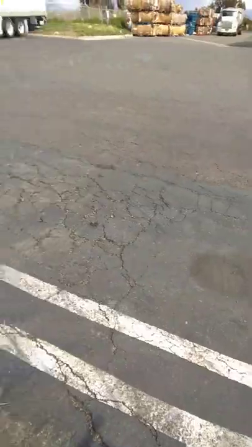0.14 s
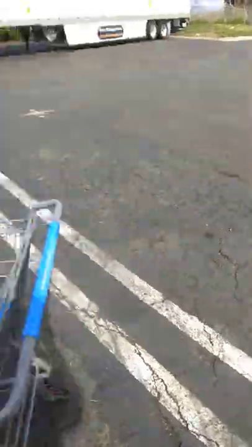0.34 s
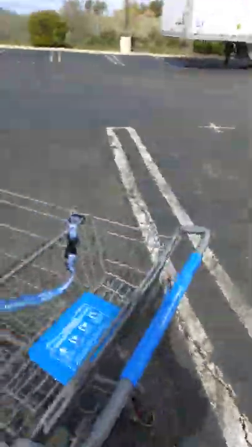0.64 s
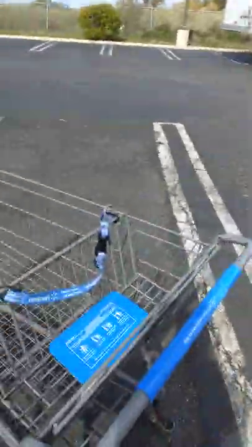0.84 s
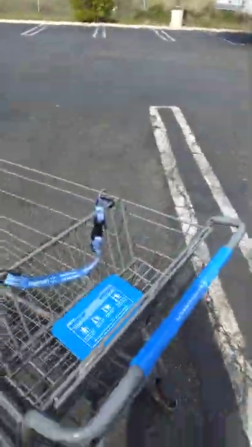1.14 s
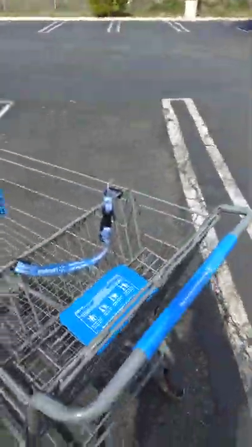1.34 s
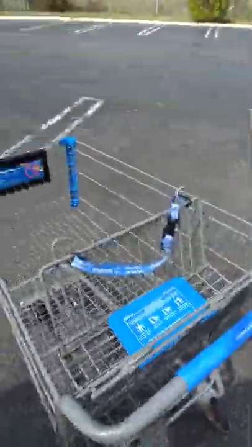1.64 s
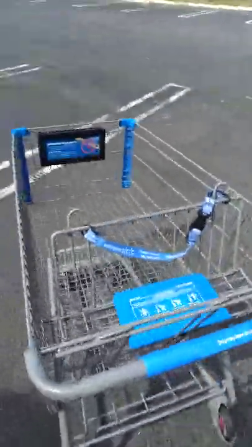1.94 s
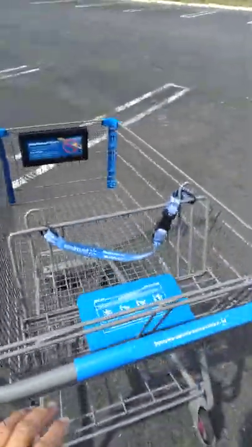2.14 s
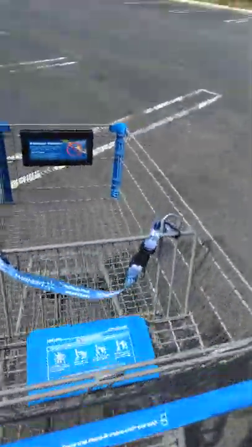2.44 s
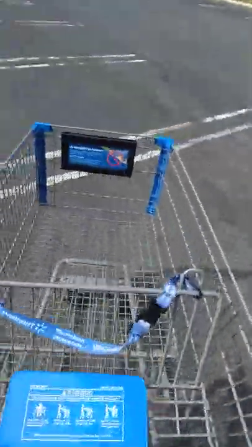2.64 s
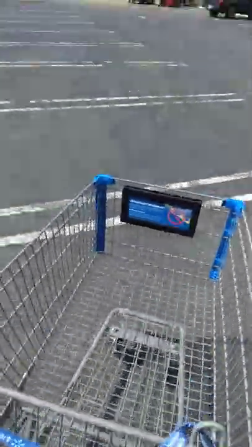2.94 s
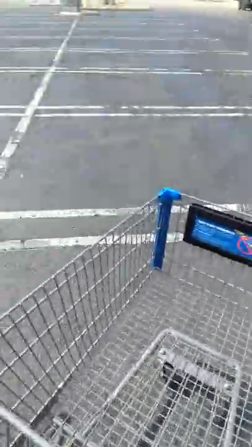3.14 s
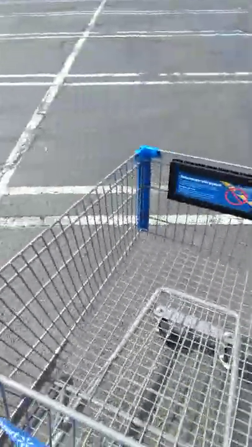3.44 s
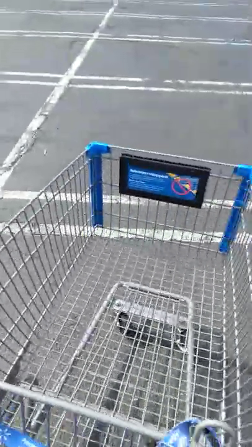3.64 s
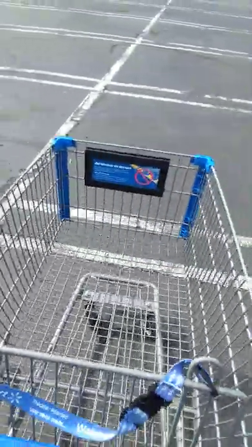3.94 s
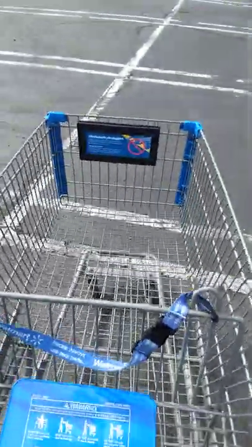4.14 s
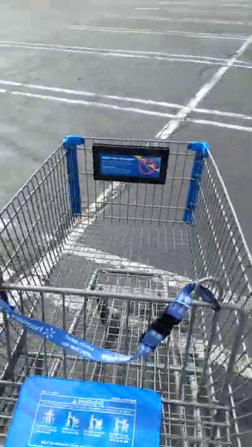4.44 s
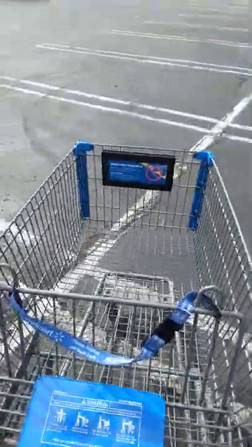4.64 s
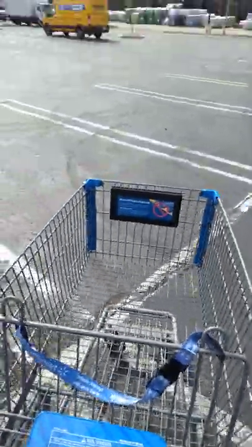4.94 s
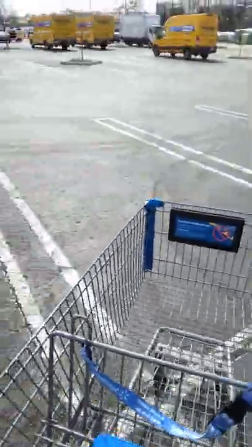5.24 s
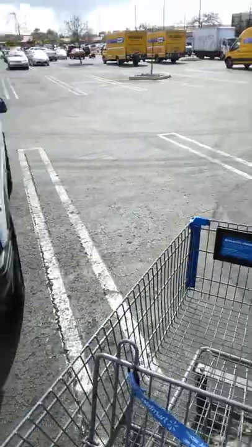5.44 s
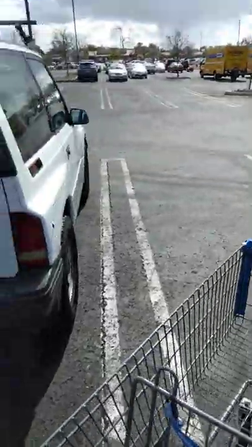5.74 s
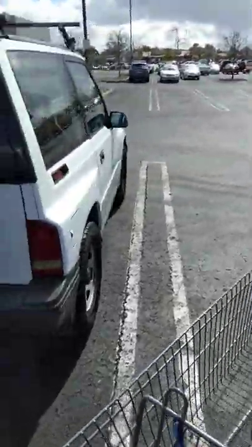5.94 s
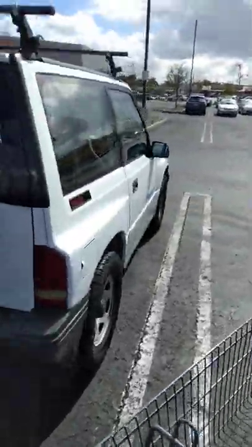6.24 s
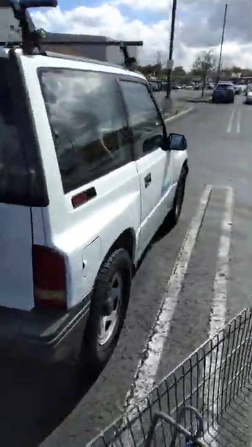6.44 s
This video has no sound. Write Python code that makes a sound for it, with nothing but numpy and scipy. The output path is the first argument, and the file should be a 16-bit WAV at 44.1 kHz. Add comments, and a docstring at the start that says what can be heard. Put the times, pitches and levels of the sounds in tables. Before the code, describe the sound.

Wind buffets a handheld phone in an open car park, a hand thumps it, then a metal wire cart rolls and rattles over rough asphalt.

```python
"""A wire shopping cart stands silent in an open car park, then rolls over rough asphalt and rattles to a stop:
filtered noise makes its wheels and loose wires, short impulses its hard blows, decaying modes its stiff rods.
Wind noise buffets the two microphone ports of a hand-held phone separately; a hand bumps the phone once.
Far traffic, a faint hum and a treble rustle fill the background, with a few scuffs and small pitched clicks.
The left port adds a strong treble resonance to the cart, the scuffs and the background."""
import sys
import numpy as np
from scipy import signal
from scipy.fft import rfft, irfft, next_fast_len
from scipy.io import wavfile
from scipy.ndimage import uniform_filter1d

SR = 44100
rng = np.random.default_rng(int(sys.argv[2]) if len(sys.argv) > 2 else 0)


def persist_wave(psi):
    """Save psi, clipped to +-1, as 16-bit WAV."""
    counts = np.round(np.clip(psi, -1, 1) * 32767).astype(np.int16)
    wavfile.write(sys.argv[1], SR, np.atleast_2d(counts).T)


N = 291093  # length in samples

# All levels below are mix settings, ahead of any trims and random swells in the functions.
# Far traffic over time. Each row: time in seconds, level in dB.
TRAFFIC_LEVEL = [(0, -49.5), (1.3, -52), (2.4, -50), (2.8, -52.5), (3.3, -46), (6.6, -53.5)]
# Tone of far traffic. Each row: frequency in Hz, relative level per hertz in dB.
TRAFFIC_TONE = [(60, 4), (200, -11), (500, -17), (1000, -19), (2500, -26), (5000, -40.5), (10000, -57),
                (16000, -52)]
# A faint treble rustle over time. Each row: time in seconds, level in dB.
RUSTLE_LEVEL = [(0, -62), (.1, -74), (.265, -73), (.29, -59.5), (.44, -60), (.51, -69), (.9, -63.5),
                (1.02, -70), (1.25, -62), (1.36, -69), (1.95, -73), (2.05, -64), (3.1, -69), (3.3, -58)]
# Tone of the rustle. Each row: frequency in Hz, relative level per hertz in dB.
RUSTLE_TONE = [(4200, -14), (4800, 1.5), (6300, -5), (7500, -11), (9000, -15), (11000, -10), (14000, -32)]
# A faint far hum over time. Each row: time in seconds, level in dB.
HUM_LEVEL = [(0, -50), (.9, -60), (6.6, -58)]
HUM_HZ = 965

# The breeze under the gusts. Each row: time in seconds, left port level in dB, right port level in dB.
BREEZE = [(0, -46, -39), (.55, -57, -42), (.62, -59, -27), (.76, -35, -24.5), (.84, -21, -34.5),
          (1.15, -29, -21), (1.5, -36, -21.5), (1.7, -24, -35), (2.2, -26, -26), (2.7, -19.5, -24),
          (3.05, -19.5, -23), (3.45, -32, -32), (4.05, -22, -23), (4.35, -33.5, -28.5), (4.6, -17, -20),
          (5.1, -25.5, -33), (5.3, -13, -17.5), (5.7, -14, -26), (5.95, -18.5, -17), (6.6, -24, -28)]
# Tone of the large eddies. Each row: frequency in Hz, relative level per hertz in dB.
LARGE_EDDY_TONE = [(8, -2.5), (30, 1), (90, -1.5), (170, -7), (300, -22.5), (600, -53), (2000, -100)]
# Tone of the small eddies. Each row: frequency in Hz, relative level per hertz in dB.
SMALL_EDDY_TONE = [(60, -20.5), (220, 1.5), (400, -8), (700, -21), (1200, -33.5), (4000, -89)]
BREEZE_BRIGHT_DB = -14.5  # small eddies against large
# Gusts at the ports. Each row: peak time in seconds, length in seconds, level at the louder port in dB,
# left minus right in dB, brightness (small eddies against large) in dB.
GUSTS = [(0.334, 0.038, -16, 14, -22), (0.973, 0.15, -21.5, 27, -0.5), (1.083, 0.14, -10.5, 8, -13.5),
         (1.213, 0.14, -16, -7, -13.5), (1.413, 0.099, -9.5, -31, -9), (1.634, 0.1, -16.5, 18, -30),
         (1.805, 0.19, -15, -16, -32), (1.95, 0.14, -30, 8, 3), (2.044, 0.27, -18.5, 18, -12),
         (2.437, 0.42, -26, 21, 6), (2.586, 0.24, -26.5, 25, 5.5), (2.914, 0.14, -8, 28, -3.5),
         (3.185, 0.18, -14, 26, -23), (3.536, 0.06, -16, 20, -29), (4.496, 0.11, -17, -17, -10),
         (4.746, 0.47, -16.5, 21, -27), (4.981, 0.04, -13, 18, -27), (5.282, 0.34, -28, 2, 0),
         (5.392, 0.07, -9, 23, -13), (5.482, 0.12, -11, 15, -5.5), (5.556, 0.17, -13.5, 7, -12.5),
         (5.668, 0.085, -9.5, 20, -6), (5.755, 0.11, -12, 21, -9), (5.89, 0.13, -13, -22, -13),
         (6.093, 0.049, -16, -17, -12), (6.39, 0.068, -11, 14, -21), (6.507, 0.098, -13, 12, -16),
         (6.557, 0.13, -14.5, -3, -13)]
GUST_ROUND = 1.66  # power of the sine arch that shapes a gust

# Small hard clicks with a pitch: one at 0.65 s, two finger ticks on the phone body during the bump,
# a faint one at 3 s. Each row: start in seconds, level in dB, pitch in Hz.
CLICKS = [(0.6465, -34, 1880), (2.317, -35, 2650), (2.3500, -31, 2670), (3.009, -48, 4700)]
# Modes of a click. Each row: multiple of the pitch, relative level in dB.
CLICK_MODES = [(1, 5.5), (2, -3), (4, -3.5)]
# The sharpest wind pops. Each row: time in seconds, level in dB, left minus right in dB.
POPS = [(0.97, -25.5, 25), (1.178, -14.5, -11), (1.389, -15, -22.5), (1.463, -20, -27), (1.797, -17.5, -20),
        (1.935, -17, 3), (2.894, -19, 26), (5.216, -14, 0), (5.265, -14.5, -20), (5.321, -10, -2),
        (5.377, -12, 20), (5.398, -24, 11), (5.437, -20, 20), (5.457, -26, 12), (5.49, -15, 16),
        (5.547, -13.5, 25), (5.591, -14.5, 15), (5.674, -22.5, 18), (6.376, -26, 19), (6.484, -19.5, 14)]

# The hand bumping the phone body. Each row: time in seconds, thud level in dB, skin rub level in dB.
BUMP = [(2.203, -9, -40), (2.218, -5, -33.5), (2.235, -9.5, -37), (2.251, -5, -31), (2.27, -13, -34),
        (2.296, -10, -46), (2.32, -21, -39), (2.36, -19.5, -45), (2.42, -23, -57)]
# Tone of the thud. Each row: frequency in Hz, relative level per hertz in dB.
THUD_TONE = [(12, -8), (35, 6), (110, -1), (240, 1), (400, -11), (850, -19), (1500, -29), (2600, -27),
             (4000, -71)]
# Tone of rubbing skin and of scuffs. Each row: frequency in Hz, relative level per hertz in dB.
RUB_TONE = [(300, -8), (1000, -13.5), (3000, -18.5), (7500, -27.5), (12000, -40), (16000, -76)]
# Fingers ticking on the phone body during the bump.
# Each row: start in seconds, level in dB, 60 dB decay time in seconds, left minus right in dB.
FINGERS = [(2.208, -22, 0.037, 2), (2.218, -17.5, 0.032, -2), (2.2253, -21.5, 0.063, -1),
           (2.2588, -22.5, 0.07, 4), (2.3136, -29, 0.022, 5), (2.3509, -19.5, 0.024, 2)]
# Tone of the phone body. Each row: frequency in Hz, relative level per hertz in dB.
SHELL_TONE = [(300, 9), (1500, 1.5), (2700, -2.5), (4200, -12), (7500, -6), (12000, -29), (16000, -43)]
# Small scuffs and ticks of shoe or grit nearby.
# Each row: start in seconds, level in dB, 60 dB decay time in seconds, left minus right in dB.
SCUFFS = [(2.786, -48.5, 0.19, 3), (2.989, -43, 0.099, -5), (3.263, -44, 0.059, -2),
          (3.2854, -36.5, 0.044, 1), (3.307, -45, 0.037, -1)]

# The rolling cart. Each row: time in seconds, how hard the basket shakes in dB.
ROLLING = [(3.35, -35), (3.53, -40), (3.62, -29.5), (3.82, -28), (4.03, -24.5), (4.14, -29), (4.24, -25.5),
           (4.31, -30), (4.44, -24), (4.55, -35.5), (4.74, -24), (4.88, -30.5), (5.05, -31.5),
           (5.19, -33.5), (5.25, -25), (5.35, -28), (5.68, -29.5), (5.8, -39), (6, -36), (6.25, -42.5),
           (6.6, -57.5)]
# Cracks in the asphalt jolt the basket. Each row: start in seconds, shake in dB, 60 dB decay time in seconds.
JOLTS = [(3.345, -28, 0.3), (3.378, -30, 0.1), (3.468, -28.5, 0.17), (3.645, -20.5, 0.13),
         (5.195, -19.5, 0.35), (5.85, -20.5, 0.25), (6.07, -27.5, 0.25), (6.262, -34.5, 0.24),
         (6.285, -29, 0.19), (6.525, -37, 0.15)]
JOLT_RISE_S = 0.0028
# Tone of the wheels on asphalt. Each row: frequency in Hz, relative level per hertz in dB.
ROAR_TONE = [(200, 4), (500, -1.5), (900, -7), (2400, -2.5), (5000, -9.5), (9000, -39), (16000, -30)]
# Chassis resonances under the wheels.
# Each row: frequency in Hz, level against the others in dB, 60 dB decay time in seconds.
CHASSIS = [(1420, -8, 0.005), (2050, -13, 0.012), (3000, -4, 0.0033)]
# Wheel level at the reference shake, and how many dB it gains per dB of shake.
WHEELS_DB, REFERENCE_SHAKE_DB, WHEELS_PER_SHAKE = -32.5, -26.5, 0.63
# Basket wires of many lengths ping at random, with pitches spread over a range.
PINGS_PER_S, PING_LOW_HZ, PING_HIGH_HZ, PING_T60_S = 400, 1002, 4200, 0.041
PINGS_DB = -10  # against the shaking
# Tone of the loose wires. Each row: frequency in Hz, relative level per hertz in dB.
CLATTER_TONE = [(500, -20.5), (2000, -6), (4000, 1.5), (7500, 0.5), (9400, -4.5), (10600, -2.5),
                (13000, -9.5), (14600, -19), (15600, -50)]
TICKS_PER_S = 500  # average rate of loose wire ticks
# The hardest wire blows. Each row: start in seconds, drive level in dB.
BLOWS = [(3.3453, -20), (3.3776, -19), (3.4695, -16), (3.5387, -14), (3.567, -14), (3.5846, -13.5),
         (3.6425, -12), (3.6955, -7), (3.7533, -20), (3.778, -17), (3.91, -21), (3.9504, -25), (3.979, -18),
         (4.0068, -4.5), (4.0617, -10), (4.1007, -5), (4.153, -13), (4.1837, -16), (4.2006, -8),
         (4.2285, -10), (4.2725, -16), (4.3405, -12), (4.367, -14), (4.4084, -19), (4.4335, -17),
         (4.476, -9), (4.5104, -8.5), (4.5454, -13.5), (4.5733, -13), (4.5777, -10.5), (4.5994, -10),
         (4.6444, -9.5), (4.6658, -8.5), (4.6724, -8), (4.6998, -11), (4.703, -9), (4.7346, -17),
         (4.756, -9), (4.811, -7), (4.843, -14), (4.873, -21), (4.888, -18), (4.9099, -9), (4.9234, -12.5),
         (4.959, -7), (4.9948, -8), (5.0227, -9), (5.0604, -6), (5.0988, -5), (5.1233, -9.5), (5.1585, -14),
         (5.195, -9), (5.27, -17), (5.3218, -17), (5.358, -12), (5.3996, -10.5), (5.4206, -12),
         (5.4745, -10), (5.5344, -7.5), (5.6323, -7.5), (5.7683, -18), (5.8138, -13), (5.848, -7),
         (5.9323, -10.5), (5.9953, -19), (6.0255, -10.5), (6.0716, -11), (6.1318, -16), (6.184, -15.5),
         (6.2609, -10), (6.2845, -15), (6.3865, -20.5), (6.4547, -21), (6.5242, -18.5)]
# Tone of a blow. Each row: frequency in Hz, relative level in dB.
BLOW_TONE = [(800, -14), (3000, -8), (5200, -6), (7300, 3.5), (9300, -14), (12500, -29), (14600, -20),
             (15600, -36)]
# Long-ringing rods and frame tubes.
# Each row: frequency in Hz, level against the others in dB, 60 dB decay time in seconds.
RODS = [(531.6, -9, 0.19), (762, -8, 0.06), (8437, -1, 0.054), (8510, -6.5, 0.072), (14185, -11, .045)]

# Left port against right port. Each row: frequency in Hz, gain in dB.
LEFT_PORT = [(400, 3.5), (1000, 0.5), (1300, 4.5), (2000, 3.5), (3000, 2), (4500, -3.5), (6000, 3),
             (6900, 12.5), (7450, 18), (8600, 9.5), (9600, 1.5), (15000, 0.5)]
EDGE_HZ = 15665  # upper band limit


def amp(db):
    """Decibels to gain."""
    return 10 ** (np.asarray(db) / 20)


def evened(x):
    """Scales to rms 1."""
    return x / np.sqrt(np.mean(x ** 2) + 1e-20)


def curves(rows):
    """Reads each column of a table at every sample."""
    s, *columns = np.transpose(rows)
    return [np.interp(np.arange(N) / SR, s, column) for column in columns]


def sides(pan_db):
    """Left and right gains for a level difference."""
    return amp(np.array([pan_db / 2, -pan_db / 2]))


def colour(x, points):
    """Causal minimum-phase filter with the given spectrum."""
    hz, db = np.transpose(points)
    bins_hz = abs(np.fft.fftfreq(8192, 1 / SR))
    gain_db = np.interp(np.log(bins_hz + 1), np.log(hz), db)
    log_gain = np.log(amp(gain_db))
    minimum_phase = np.exp(np.conj(signal.hilbert(log_gain)))
    taps = np.fft.ifft(minimum_phase).real[:4096]
    size = next_fast_len(N + len(taps))
    return irfft(rfft(np.atleast_2d(x), size) * rfft(taps, size), size)[:, :N]


def banded(x, lo_hz, hi_hz):
    """Scales steady noise so that its band lo-hi has rms 1, judging the spectrum from its end."""
    part = x[:, -2 ** 16:]
    power = abs(rfft(part)) ** 2
    hz = np.fft.rfftfreq(part.shape[1], 1 / SR)
    in_band = (hz > lo_hz) & (hz < hi_hz)
    return evened(x) * np.sqrt(power.sum() / power[:, in_band].sum())


def pair(same, lag):
    """Two noises with a shared part that reaches the left port lag samples late (early if negative)."""
    a, b = rng.standard_normal((2, N))
    return np.array([np.roll(same * a + np.sqrt(1 - same ** 2) * b, lag), a])


def wobble(seconds, channels):
    """Slow chance of rms 1: noise smoothed twice."""
    size = max(round(seconds * SR), 1)
    smooth = uniform_filter1d(rng.standard_normal((channels, N)), size)
    return evened(uniform_filter1d(smooth, size))


def bursts(rows, rise_s):
    """Envelope of quick rises and exponential decays, rows (s, dB, t60)."""
    out = np.zeros(N)
    for s, db, t60 in rows:
        start = round(s * SR)
        t = np.arange(min(round(t60 * SR) + 1, N - start)) / SR
        out[start:][:len(t)] += amp(db - 60 * t / t60) * (1 - np.exp(-t / rise_s))
    return out


def ring(x, hz, t60):
    """One decaying mode as a two-pole resonator, rms gain about 1 on white noise."""
    r = np.exp(-np.log(1000) / (t60 * SR))
    angle = 2 * np.pi * hz / SR
    gain = np.sqrt(2 * (1 - r * r)) * np.sin(angle)
    return gain * signal.lfilter([1], [1, -2 * r * np.cos(angle), r * r], x)


def background():
    """Far traffic, smooth and diffuse, a faint hum and a faint rustle in the treble."""
    (traffic_db,), (rustle_db,), (hum_db,) = curves(TRAFFIC_LEVEL), curves(RUSTLE_LEVEL), curves(HUM_LEVEL)
    traffic = banded(colour(pair(0.45, lag=10), TRAFFIC_TONE), 786, 3500)
    traffic = traffic * amp(traffic_db + 1.3 * wobble(0.02, channels=2))
    rustle = evened(colour(pair(0.22, lag=9), RUSTLE_TONE))
    rustle = rustle * amp(rustle_db + 1.8 * wobble(0.0054, channels=1))
    hum = amp(hum_db) * ring(pair(0.4, lag=15), HUM_HZ, 0.31)
    return traffic + rustle + hum


def wind():
    """Lumpy eddies, unrelated at the two ports; each gust has its own share of small bright eddies."""
    breeze = amp([0, BREEZE_BRIGHT_DB])[:, None, None] * amp(curves(BREEZE))
    large_gain, small_gain = np.sqrt(breeze ** 2 + gusts())
    lumps = np.minimum(wobble(0.013, channels=2), 1.4)
    large = evened(colour(rng.standard_normal((2, N)), LARGE_EDDY_TONE)) * amp(3.8 * lumps)
    small = evened(colour(rng.standard_normal((2, N)), SMALL_EDDY_TONE)) * amp(3.1 * lumps)
    return amp(-1.24) * (large_gain * large + small_gain * small)


def gusts():
    """Power of the large and of the small eddies at each port: every gust swells and sinks as one arch."""
    power = np.zeros((2, 2, N))  # eddy size, port, time
    for s, length, db, pan_db, bright_db in GUSTS:
        progress = np.clip((np.arange(N) / SR - s) / length + 0.5, 0, 1)
        arch = abs(np.sin(np.pi * progress)) ** GUST_ROUND
        port_gain = amp([db + min(pan_db, 0), db - max(pan_db, 0)])[:, None]
        power += (amp([0, bright_db])[:, None, None] * (port_gain * arch)) ** 2
    return power


def clicks():
    """Each click rings a few modes of its pitch for a moment, alike at both ports."""
    out, t = np.zeros(N), np.arange(400) / SR
    for s, db, pitch_hz in CLICKS:
        for multiple, mode_db in CLICK_MODES:
            envelope = amp(db + mode_db - 60 * t / 0.0071) * np.minimum(t / 0.00017, 1)
            hz = min(pitch_hz * multiple, 12000)
            out[round(s * SR):][:len(t)] += envelope * np.sin(2 * np.pi * hz * t)
    return out


def pops():
    """A single eddy breaking on a port: a short push and rebound."""
    out = np.zeros((2, N))
    for (s, db, pan_db), width in zip(POPS, rng.random(len(POPS))):
        width_s = 0.00061 + 0.00099 * width
        u = np.arange(-3, 3, 1 / (SR * width_s))
        start = round((s + 0.00099) * SR)
        push = amp(db + 4.5) * -u * np.exp(-u ** 2)
        out[:, start:start + len(u)] += sides(pan_db)[:, None] * push
    return out


def bump():
    """The phone body shakes both ports nearly alike: a rough thud with skin rubbing over it."""
    before, after = (BUMP[0][0] - 0.006, -90, -90), (BUMP[-1][0] + 0.035, -70, -80)
    thud_db, rub_db = curves([before] + list(BUMP) + [after])
    thud = evened(colour(pair(0.94, lag=-9), THUD_TONE))
    thud = thud * amp(thud_db + 0.92 * wobble(0.0097, channels=1))
    rub = banded(colour(pair(0.7, lag=-12), RUB_TONE), 1500, 12000)
    rub = rub * amp(rub_db - 3 + 3 * wobble(0.003, channels=1))  # gritty
    return thud, rub


def scuffs(rows, tone, same):
    """Short noisy scrapes or ticks: bursts of coloured noise, panned by level."""
    left = bursts([(s, db + pan_db / 2, t60) for s, db, t60, pan_db in rows], 0.0017)
    right = bursts([(s, db - pan_db / 2, t60) for s, db, t60, pan_db in rows], 0.0017)
    scrape = banded(colour(pair(same, lag=-3), tone), 2150, 12000)
    return amp(-1.5) * np.array([left, right]) * scrape


def cart():
    """Wheels roar on the grit, loose wires ping and tick, hard blows stand out; stiff rods ring with both."""
    shake_db = shaking()
    shake = ticking() * amp(shake_db)
    wires = shake * evened(colour(pair(0.13, lag=-13), CLATTER_TONE)) * amp(-2.5)
    strikes = blow_strikes()
    chatter = bursts([(s, db, 0.014) for s, db in BLOWS], 0.0002) * pair(0.32, lag=-13)
    blows = colour(amp(15.5) * strikes + amp(-3.5) * chatter, BLOW_TONE) * amp([[-5], [-9]])  # left, right
    knocked = shake * pair(0.21, lag=-13) + amp(6.5) * strikes
    return wheels(shake_db) + pings(shake_db) + wires + blows + amp(-12.5) * rods(knocked)


def shaking():
    """How hard the basket shakes, in dB: still until the first jolt, then the rolling plus each dying jolt."""
    rolling = amp(curves(ROLLING)[0]) * (np.arange(N) / SR > JOLTS[0][0])
    return 10 * np.log10(rolling ** 2 + bursts(JOLTS, JOLT_RISE_S) ** 2 + 1e-12)


def ticking():
    """Envelope of loose wires ticking at random, each tick dying away over a steady floor."""
    sizes = amp(3.3 * np.minimum(rng.exponential(1, N), 3))
    ticks = (rng.random(N) < TICKS_PER_S / SR) * sizes
    decay = np.exp(-np.log(1000) / (0.025 * SR))  # 60 dB in 25 ms
    return evened(signal.lfilter([1], [1, -decay], ticks) + 2.35)


def blow_strikes():
    """Each hard blow is an impulse and three softer bounces of the wire, a little later on the right."""
    strikes = np.zeros((2, N))
    for (s, db), (bounce, late) in zip(BLOWS, rng.random((len(BLOWS), 2))):
        # gap after the blow in samples, level against it in dB
        hits = ((0, 0), (25 + 40 * bounce, -6), (90 + 60 * late, -5), (250 + 200 * bounce, -13))
        for gap, loss_db in hits:
            left_at = round(s * SR + gap)
            right_at = round(s * SR + gap + 8 + 14 * late)
            strikes[[0, 1], [left_at, right_at]] += amp(db + loss_db)
    return strikes


def rods(knocked):
    """The shaking and the blows ring long modes; each rod is caught unevenly."""
    caught = amp(3 * np.minimum(wobble(0.03, channels=len(RODS)), 1.5))
    return sum(amp(db) * ring(knocked * luck, hz, t60) for (hz, db, t60), luck in zip(RODS, caught))


def wheels(shake_db):
    """Grit under the wheels gives a broad roar and kicks each chassis resonance in its own short spells."""
    roughness = amp(1.9 * wobble(0.0031, channels=1) + 0.28 * wobble(0.011, channels=1))
    grit = pair(0.2, lag=-14) * roughness
    roar = amp(-5.5) * banded(colour(grit, ROAR_TONE), 830, 5200)
    spells = amp(3.5 * np.minimum(wobble(0.012, channels=len(CHASSIS)), 1.5))
    chassis = sum(amp(db) * evened(ring(grit * spell, hz, t60))
                  for (hz, db, t60), spell in zip(CHASSIS, spells))
    return (roar + chassis) * amp(WHEELS_DB + WHEELS_PER_SHAKE * (shake_db - REFERENCE_SHAKE_DB))


def pings(shake_db):
    """Now one basket wire, now another is caught and rings briefly."""
    sizes = amp(3 * np.minimum(rng.exponential(1, N), 3))
    catches = (rng.random(N) < PINGS_PER_S / SR) * sizes
    wire, t, out = rng.integers(0, 24, N), np.arange(4000) / SR, np.zeros(N)
    pitches_hz = np.geomspace(PING_LOW_HZ, PING_HIGH_HZ, num=24) * rng.uniform(0.97, 1.03, 24)
    for k, hz in enumerate(pitches_hz):
        tone = amp(-60 * t / PING_T60_S) * np.sin(2 * np.pi * hz * t)
        out += signal.oaconvolve(catches * (wire == k), tone)[:N]
    out = evened(out) * amp(shake_db + PINGS_DB)
    return np.array([np.roll(out, -14), out])  # left leads by 14 samples


def scene():
    """Airborne sound takes on the left port's resonance; wind, hand and clicks bypass it."""
    thud, rub = bump()
    air = cart() + background() + scuffs(SCUFFS, RUB_TONE, 0.23)
    air[0] = colour(air[0], LEFT_PORT)[0]
    fingers = scuffs(FINGERS, SHELL_TONE, 0.26)
    return air + thud + rub + fingers + clicks() + wind() + pops()


def record(dry):
    """The input stage saturates with a short knee at full scale; then the band limit."""
    saturated = dry / (1 + dry ** 10) ** 0.1
    padded = np.pad(saturated, [(0, 0), (255, 255)], "reflect")
    low_pass = signal.firwin(511, EDGE_HZ, window=("kaiser", 9), fs=SR)
    return signal.oaconvolve(padded, low_pass[None], "valid")


dry = scene()
out = record(dry)
persist_wave(out)
```